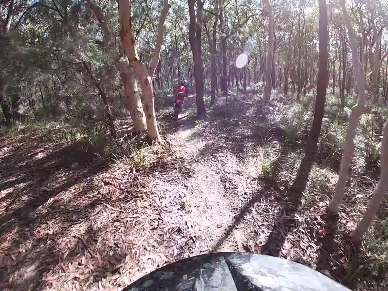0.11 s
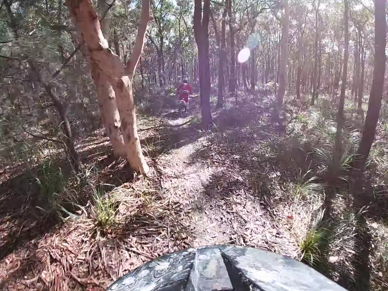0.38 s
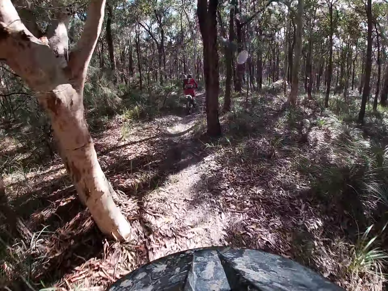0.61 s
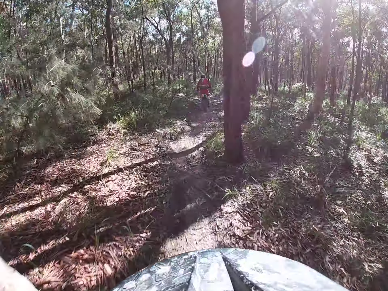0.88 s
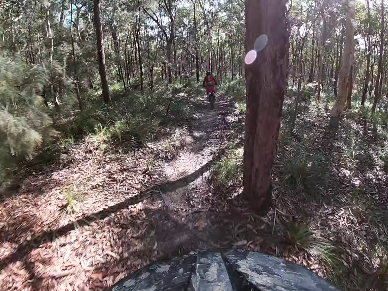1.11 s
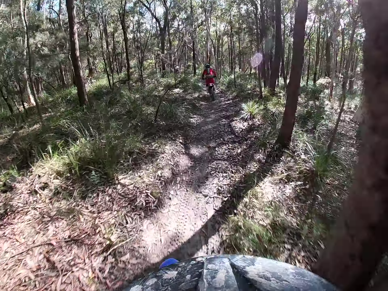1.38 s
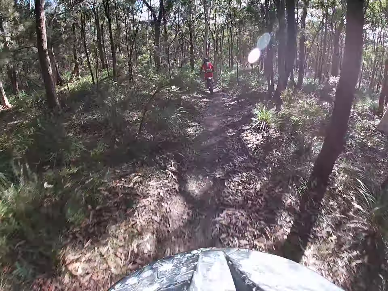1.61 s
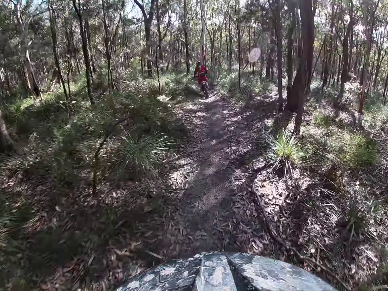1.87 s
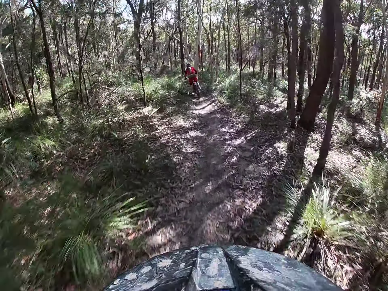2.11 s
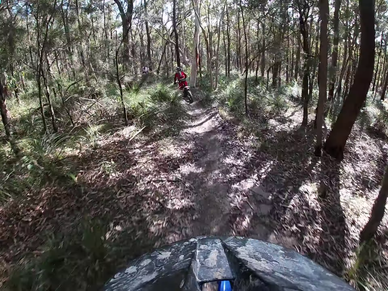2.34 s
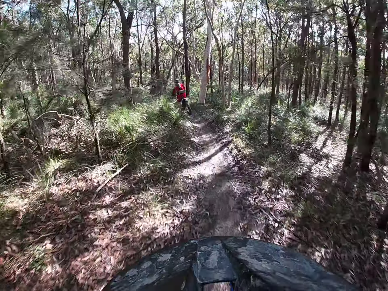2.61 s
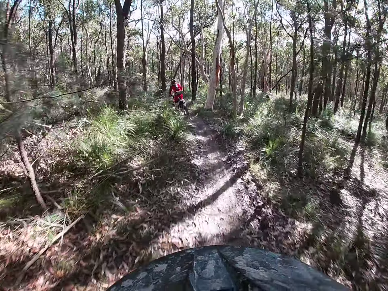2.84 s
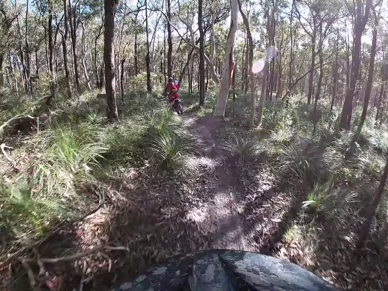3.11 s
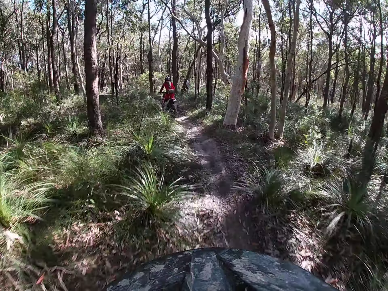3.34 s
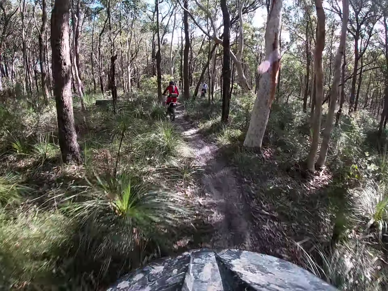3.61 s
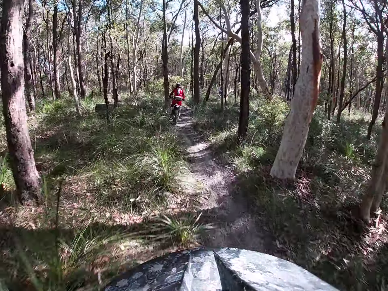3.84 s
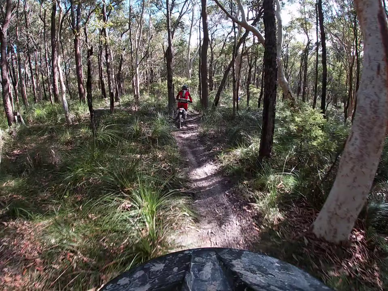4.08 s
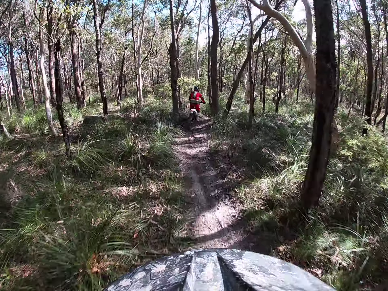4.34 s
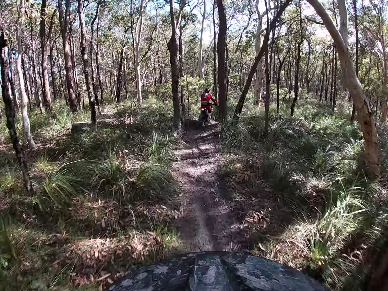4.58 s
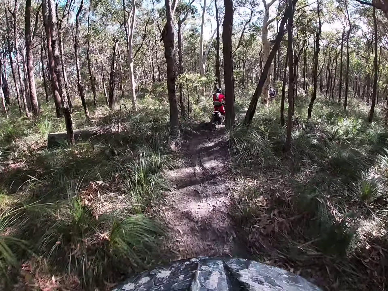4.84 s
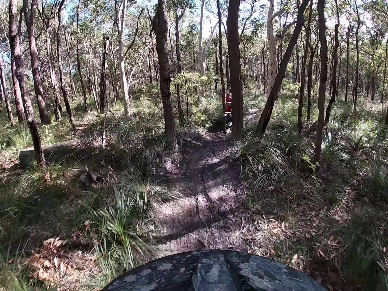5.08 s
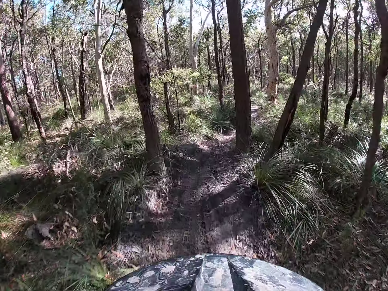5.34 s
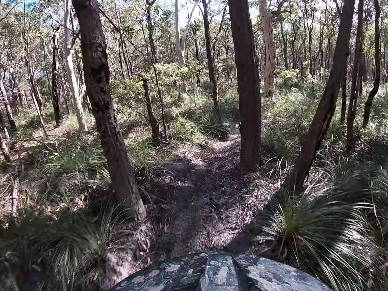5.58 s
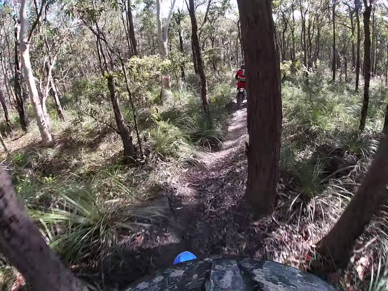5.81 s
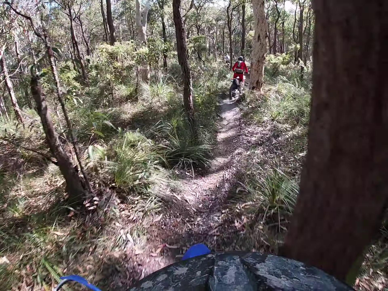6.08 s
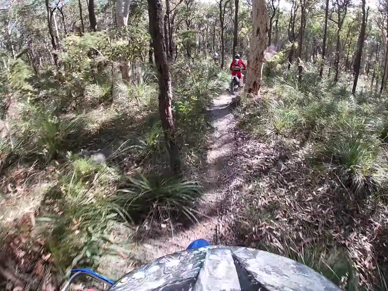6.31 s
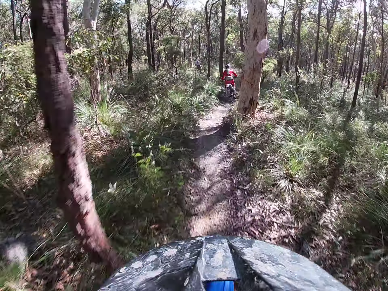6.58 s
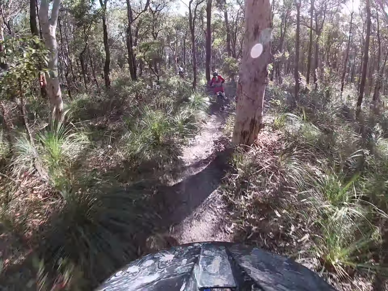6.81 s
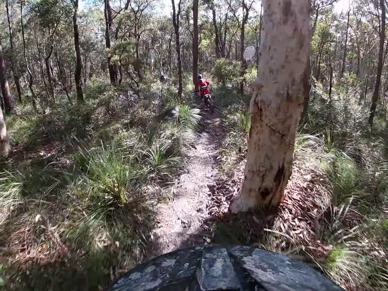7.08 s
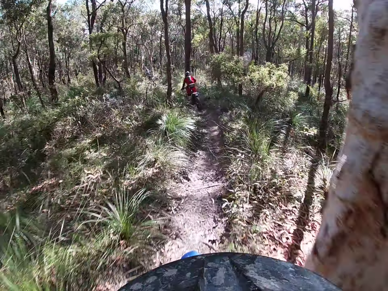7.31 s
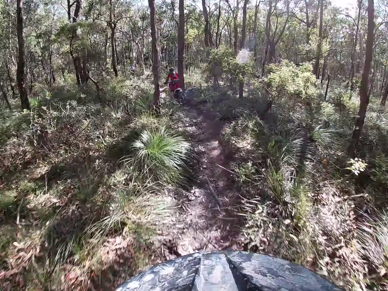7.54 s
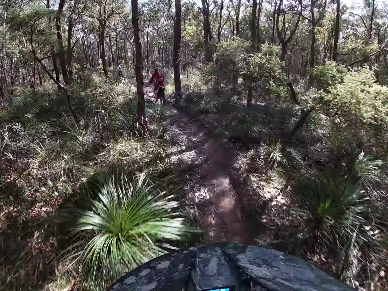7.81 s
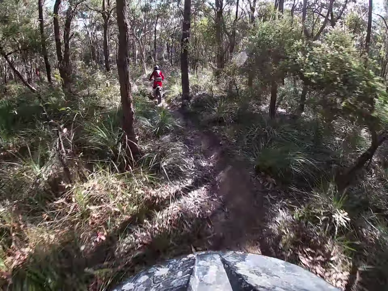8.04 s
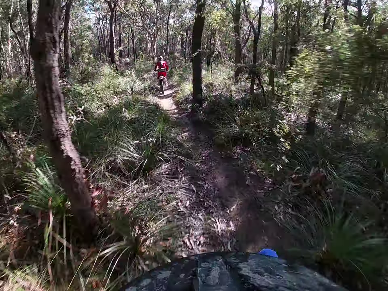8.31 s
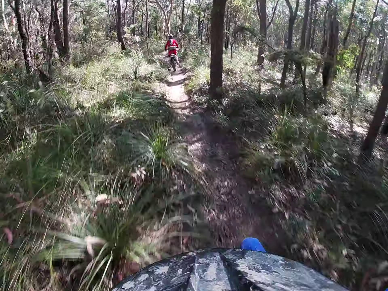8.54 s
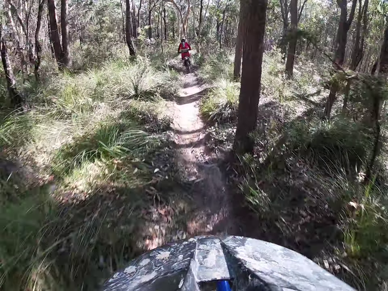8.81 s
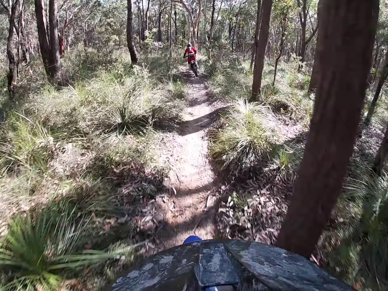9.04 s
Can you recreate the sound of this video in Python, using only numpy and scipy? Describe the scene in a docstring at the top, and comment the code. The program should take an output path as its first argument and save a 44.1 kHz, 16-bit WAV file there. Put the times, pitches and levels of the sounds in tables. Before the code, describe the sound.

Muffled onboard dirt bike engine, low throaty popping that rises and sags with quick throttle changes, over buzzing parts, chain clatter and soft wind buffeting.

```python
"""Forest trail, riding a single-cylinder dirt bike, the microphone muffled in a sealed case on the rider's helmet.
Each exhaust pulse rings the pipe modes; cycles burn fully or weakly as the throttle works, and some miss.
Rough gas rushes out with each pulse, and the frame hums at the firing rate and its double.
A loose panel and a bracket ring at their resonances; tyres, chain and valve gear make broad noise.
Low noise is wind on the case, clusters of tiny snaps are brush, short noise bursts are ticks and jolts."""
import sys
import numpy as np
from scipy import signal
from scipy.fft import rfft, irfft, next_fast_len
from scipy.io import wavfile
from scipy.ndimage import map_coordinates

SR = 44100
rng = np.random.default_rng(int(sys.argv[2]) if len(sys.argv) > 2 else 0)


def generate_wav(signal):
    """Clip the signal to [-1, 1] and save it as 16-bit WAV at the path in sys.argv[1]."""
    frames = np.transpose(np.atleast_2d(signal))
    scaled = np.clip(frames, -1, 1) * 32767
    pcm = np.round(scaled).astype(np.int16)
    wavfile.write(sys.argv[1], SR, pcm)


def linear_from_db(decibels):
    """Turn decibels (scalar or array-like) into linear amplitude factors; 0 gives 1."""
    return 10 ** (np.asarray(decibels, float) / 20)


N = 404397   # samples


def rms_one(x):
    """Scale to rms 1."""
    return x / np.sqrt(np.mean(x ** 2) + 1e-20)


def in_time(rows, s):
    """Columns of a curve table, interpolated at times s."""
    at, *columns = np.transpose(rows)
    return [np.interp(s, at, column) for column in columns]


def coloured(spectrum):
    """Noise shaped to a (hz, density_db) spectrum, then scaled to rms 1."""
    hz, db = np.transpose(spectrum)
    size = next_fast_len(N)
    grid_hz = np.maximum(np.arange(size // 2 + 1) * SR / size, 1)
    shape = linear_from_db(np.interp(np.log(grid_hz), np.log(hz), db, left=-90, right=-120))
    white = rng.standard_normal(size)
    return rms_one(irfft(rfft(white) * shape, size)[:N])


def drift(rate):
    """Smooth chance curve through unit-spread random knots, rate knots per second."""
    knots = rng.standard_normal(2000)
    return map_coordinates(knots, [np.arange(N) * rate / SR], order=3)


def add(out, s, sound):
    """Mix a short sound in at time s."""
    i = int(round(s * SR))
    out[i:i + len(sound)] += sound[:max(len(out) - i, 0)]


# Engine speed: start_s [s], pulse_rate_hz [exhaust pulses per s]
ENGINE_SPEED = [(0.0, 37.43), (0.23, 34.92), (0.38, 39.77), (0.98, 39.84), (1.04, 38.07), (1.36, 41.14),
                (1.6, 34.06), (1.77, 47.97), (1.92, 41.18), (2.15, 47.68), (2.23, 44.05), (2.67, 45.81),
                (2.83, 37.43), (3.0, 42.37), (3.19, 39.46), (3.6, 44.09), (3.84, 34.63), (4.34, 32.91),
                (4.57, 35.72), (4.94, 32.78), (5.09, 34.04), (5.9, 32.83), (6.02, 36.69), (6.25, 29.42),
                (6.57, 42.92), (7.04, 43.39), (7.17, 35.18), (7.67, 43.08), (7.78, 36.16), (8.19, 36.34),
                (8.4, 45.38), (8.54, 39.67), (8.77, 44.85), (9.17, 48.16)]


def engine_turns():
    """Running count of engine cycles, one exhaust pulse each: the integral of the pulse rate."""
    pulse_rate_hz, = in_time(ENGINE_SPEED, np.arange(N) / SR)
    return 0.02 + np.cumsum(pulse_rate_hz) / SR   # 0.02 of a cycle is gone at time zero


# Throttle, held until the next row: start_s [s], full_burns [share of cycles, 0 shut to 1 open]
THROTTLE_HELD = [(0, 0), (.32, .5), (.475, .5), (.55, 1), (.6, .5), (.75, 1), (.9, .5), (1.05, .9),
                 (1.235, .5), (1.41, 1), (1.435, .5), (1.485, .34), (1.62, 1), (1.75, .95), (2.19, .5),
                 (2.35, 1), (2.51, .9), (2.68, 0), (2.73, .125), (2.93, .34), (3.1, .17), (3.3, .34),
                 (3.67, 0), (4.27, .4), (4.77, 1), (4.98, .96), (5.6, .5), (5.75, .75), (6.05, 0),
                 (6.08, 1), (7.03, 0), (7.15, .36), (7.26, .5), (7.34, .5), (7.64, .34), (7.93, .17),
                 (8.18, 1), (8.34, .5), (8.54, 1)]
# Cycles with no burn: a faint weak pulse, 13.5 dB down, with a dull puff: start_s [s], puff_db [dB]
MISFIRES = [(.94, -26), (2.67, -22), (2.99, -36.5), (3.55, -32), (3.74, -21), (5.23, -13), (5.41, -26),
            (5.53, -24), (5.71, -8), (6.15, -8), (6.28, -10), (7.73, -11.5), (8.11, -13)]


def full_burns(starts):
    """At part throttle fresh charge gathers over some weak cycles before each full burn; misfires do not burn."""
    since, opening = np.transpose(THROTTLE_HELD)
    row = np.searchsorted(since, starts + .004) - 1
    cycles = np.arange(len(row)) - np.searchsorted(row, row)   # since the throttle moved
    charge = opening[row] * cycles + 1e-6
    burns = np.floor(charge) > np.floor(charge - opening[row])
    missed = {np.argmin(abs(starts + .004 - s)): puff_db for s, puff_db in MISFIRES}
    burns[list(missed)] = False
    return burns, missed


def swell(hz, decay_ms):
    """A pipe mode fed through a chamber: its envelope peaks at 1 after one decay time, then dies."""
    u = np.arange(2600) / SR
    k = u * 1000 / decay_ms
    return k * np.exp(1 - k) * np.sin(2 * np.pi * hz * u)


# Seven pipe modes, lowest first, before the trims, wander and stretch below:
# pitch_hz [Hz], level_db [dB], decay_ms [ms], polarity [signed gain]
COOL_GAS_MODES = [(87.5, -14.5, 2.9, 0.9), (181.7, -7.5, 2.95, 0.97), (252.5, -23, 4.3, -1.1),
                  (320, -6, 3.6, -0.36), (501.5, -9, 2.97, -0.43), (680, -22.5, 3.8, -0.3),
                  (871, -38.5, 4, 0.77)]   # full burn, cool gas
HOT_GAS_MODES = [(97, -18, 4.1, 1), (214, -7, 3.3, 0.95), (300, -12, 3.2, -0.57), (340.5, -6.5, 1.2, -0.41),
                 (565, -6.5, 2.1, -0.34), (755, -30.5, 3.6, -0.31), (940, -37, 2.5, 0.53)]   # full burn, hot gas
WEAK_BURN_MODES = [(76, -28.5, 4, 0.92), (152.2, -12.5, 5.6, -0.96), (215.8, -16.5, 3.6, 0.66),
                   (280, -9, 4.48, -0.64), (470, -2, 2.34, -0.15), (695, -26.5, 8.6, -0.084),
                   (872, -50.5, 6.7, 0.81)]   # weak burn or miss
# Engine load: start_s [s], bark_db [dB], sharpness_db [dB], heat [0 cool to 1 hot gas]
ENGINE_LOAD = [(0, -16, 11.5, 0.15), (.3, -19.5, 9, 0.066), (.56, -12.5, 2, 0.35), (1, -16, 9, 0.51),
               (1.4, -13.5, 3.5, 0.41), (1.52, -20, 1, 0.31), (1.7, -10.5, 3, 0.26), (1.82, -24, 7.5, 1.18),
               (2.1, -13, 3.5, 0.47), (2.25, -13, 3, 0.37), (2.4, -12, 0.5, 0.25), (2.58, -12.5, 1, 0.13),
               (2.7, -11, -1.5, 0.42), (2.9, -14, 0.5, 0.2), (3.19, -13.5, 0, 0.23), (3.5, -14.5, 1, 0.3),
               (3.72, -16.5, 12, 0.4), (4.03, -20.5, 20, .1), (4.35, -20.5, 8.5, 0.044),
               (4.8, -17.5, 9.5, 0.049), (5.3, -14, 10, 0.053), (5.6, -15, 6, 0.094), (5.8, -20.5, 1, .1),
               (6.18, -24.5, 8, 0.45), (6.4, -14, 1.5, 0.36), (6.7, -16.5, 6, 0.65), (7.02, -13, 2, 0.54),
               (7.1, -18.5, 6, 0.44), (7.6, -17, 1, 0.57), (7.78, -19, 11, 0.59), (8.12, -20, 10.5, 0.3),
               (8.28, -10, 1, 0.72), (8.45, -21, 9, 1.18), (8.65, -19, 2.5, 0.99), (9, -15, -1.5, 0.94),
               (9.17, -15, 3, 1)]
# Back pressure makes the middle modes ring on: start_s [s], pressure_db [dB], sixth_mode_db [dB]
PIPE_PRESSURE = [(0, 2, -1.5), (.18, 2, 15), (.3, 3, 4), (.45, 1.7, 6), (1, 1.4, -1.5), (1.5, 1.8, -0.5),
                 (1.9, 3, 6), (2.2, 1, 10.5), (2.6, 2.5, 9.5), (3, 1.4, 10.5), (3.5, 1.9, 1.5),
                 (4, 1.5, -6.5), (4.5, 1, -6.5), (5, 2.5, 4.5), (5.5, 3, 1), (6, 1.8, -1), (6.4, 3, 0),
                 (6.9, 1.8, 5.5), (7.3, 2.2, -5), (7.8, 1.9, -7), (8.2, 2, 6.5), (8.6, 1.3, 12.5),
                 (9.17, 2.5, -7)]
# Gain of each pipe mode: share [dB per dB]; with bark, the lowest booms on the overrun
FULL_BARK_SHARES = [-0.39, 0.58, 1, -0.65, -0.012, 0.7, 0.92]
WEAK_BARK_SHARES = [-3.5, 1, 0, -0.13, 0.96, 0.91, 0.4]
SHARPNESS_SHARES = [0.29, 0.16, 0, 0.014, 0.38, 1, 0.75]
PIPE_PRESSURE_SHARES = [-1.3, -0.14, 1, 0.94, -0.45, -1.1, -1.1]


def exhaust(turns):
    """Each cycle's pulse sets seven pipe modes swelling and dying; a short snap opens each full burn."""
    starts = np.searchsorted(turns, np.arange(int(turns[-1]) + 1)) / SR
    bark_db, sharp_db, heat = in_time(ENGINE_LOAD, starts)
    heat = np.clip(heat, 0, 1.3)
    pressure_db, sixth_db = in_time(PIPE_PRESSURE, starts)
    burns, missed = full_burns(starts)

    bark_shares = np.where(burns[:, None], FULL_BARK_SHARES, WEAK_BARK_SHARES)
    trims_db = (bark_db + 16)[:, None] * bark_shares   # bark counts from -16 dB
    trims_db += np.outer(sharp_db, SHARPNESS_SHARES)
    trims_db += np.outer(pressure_db, PIPE_PRESSURE_SHARES)
    trims_db += np.outer(sixth_db, np.arange(7) == 5)
    # a full burn after a weak or missed cycle is slightly quieter
    trims_db += -0.5 * (burns & ~np.roll(burns, 1))[:, None]

    cool, hot, weak = np.array(COOL_GAS_MODES), np.array(HOT_GAS_MODES), np.array(WEAK_BURN_MODES)
    stretch = 1 + 0.25 * pressure_db   # back pressure lengthens the ringing
    chance = rng.standard_normal((len(starts), 16))
    out = np.zeros(N)
    for k, s in enumerate(starts):
        # sound is faster in hot gas, so the modes rise
        if burns[k]:
            modes = cool + heat[k] * (hot - cool)
        else:
            modes = weak * [1 + 0.2 * heat[k], 1, 1, 1]
        # each mode wanders alone, and all wander together
        wander_db = [.6, .5, .6, .7, .8, 1.2, 1.5] * chance[k, :7]
        wander_db = wander_db + [0, .3, .6, .6, .7, .9, .9] * chance[k, 15:]
        detune = [.008, .005, .008, .009, .013, .013, .016] * chance[k, 7:14] + .006 * chance[k, 14]
        pulse = 0
        for m, (hz, db, decay_ms, polarity) in enumerate(modes):
            gain = linear_from_db(db + trims_db[k, m] + wander_db[m])
            ring = swell(hz * (1 + detune[m]), max(decay_ms * stretch[k], 1.5))
            pulse = pulse + polarity * gain * ring
        if k in missed:   # the unburnt charge leaves as a low puff
            pulse = linear_from_db(-13.5) * pulse + linear_from_db(missed[k]) * swell(74, 5.9)
        leaves = s - .0013 * heat[k] * burns[k]   # a full burn in hot gas leaves sooner
        add(out, max(leaves, 0), pulse)
        if burns[k]:   # the snap runs 1.5 ms ahead
            snap_db = -25 + 0.094 * sharp_db[k] + 1.5 * chance[k, 6]
            add(out, leaves - .0015, linear_from_db(snap_db) * swell(656, 1.3))
    return out


def silencer(pulses):
    """A low-pass at 1500 Hz takes the edge off each pulse."""
    return signal.sosfilt(signal.butter(4, 1500, fs=SR, output="sos"), pulses)


# Turbulent gas at the outlet: start_s [s], level_db [dB]
OUTLET_RUSH = [(0, -35.5), (.6, -38), (1.5, -37), (1.9, -43.5), (2.2, -30), (2.6, -32), (2.9, -32),
               (3.4, -34), (4, -43.5), (4.8, -41), (5.5, -40), (6.2, -40.5), (6.7, -31.5), (7.2, -33),
               (7.6, -29.5), (8.1, -42.5), (8.45, -27.5), (9.17, -26.5)]
# Its relative spectrum: pitch_hz [Hz], density_db [dB per Hz]
OUTLET_SPECTRUM = [(300, -18), (450, 2.5), (700, 0.5), (900, -5.5), (1200, -15), (2000, -18.5), (3500, -35),
                   (5000, -46)]


def rush(turns):
    """Each pulse drags a puff of rough noise out of the pipe, no two alike."""
    k = (turns % 1) / 0.17   # the puff peaks 0.17 of a cycle in
    strength_db = 2.5 * rng.standard_normal(2000)[turns.astype(int)]
    level_db, = in_time(OUTLET_RUSH, np.arange(N) / SR)
    return linear_from_db(level_db + strength_db) * k * np.exp(1 - k) * coloured(OUTLET_SPECTRUM)


# Frame hum: start_s [s], first_order_db [peak dB], second_order_db [peak dB]
FRAME_HUM = [(0, -34.5, -40), (.8, -31, -32.5), (1.9, -34.5, -32.5), (3, -36, -36), (3.7, -33.5, -31),
             (4.4, -31.5, -32), (5.1, -32.5, -25), (5.8, -31.5, -21.5), (6.3, -29.5, -31.5),
             (6.9, -32, -38), (7.8, -32, -27), (8.4, -25.5, -32.5), (9.17, -31, -34)]


def thrum(turns):
    """The frame hums as two sines on the first two orders of the firing rate."""
    first_db, second_db = in_time(FRAME_HUM, np.arange(N) / SR)
    first = linear_from_db(first_db) * np.sin(2 * np.pi * (turns - .3))
    second = linear_from_db(second_db) * np.sin(4 * np.pi * (turns - .1))
    return first + second


# Resonances of each loose part: pitch_hz [Hz], width_hz [Hz], level_db [relative dB]
PANEL_MODES = [(1275, 58, 0), (1215, 70, -7), (1155, 30, -14), (1400, 20, -19)]
BRACKET_MODES = [(2150, 230, 0), (2600, 500, -5), (1680, 130, -7), (3720, 200, -19)]


def buzz(turns, modes, level_db, throb_db, lag, knock_db, patchy_db):
    """A loose part rings at its resonances: knocked about once a cycle and shaken by the frame."""
    fade_db = -2 * throb_db * ((turns - lag) % 1)   # across each cycle
    shake = rng.standard_normal(N) * linear_from_db(fade_db + 1.0 * drift(25))
    knocked = np.diff(np.floor(turns - lag + .03 * drift(40)), prepend=0) > 0
    knocks = knocked * linear_from_db(1.8 * drift(30))
    drive = rms_one(shake) + linear_from_db(knock_db) * rms_one(knocks)
    out = 0
    for m, (hz, width_hz, db) in enumerate(modes):
        r = np.exp(-np.pi * width_hz / SR)   # pole radius
        section = [1, 0, -1, 1, -2 * r * np.cos(2 * np.pi * hz / SR), r * r]
        ring = rms_one(signal.sosfilt([section, section], drive))
        out = out + (-1) ** m * linear_from_db(db) * ring
    return linear_from_db(level_db + patchy_db * drift(4.8)) * out


# Relative noise spectra: pitch_hz [Hz], density_db [dB per Hz]
ROAR_SPECTRUM = [(400, 10.5), (650, 2.5), (800, -9), (1100, -8), (1400, -10.5), (1650, -11.5),
                 (2000, -15.5), (2600, -29), (4000, -40.5)]
CLATTER_SPECTRUM = [(1500, -8), (2500, -4.5), (3100, -5), (3600, -7), (4200, -11.5), (5500, -11),
                    (7200, -25), (9000, -28), (10300, -34), (10700, -45), (12000, -35), (13000, -38.5),
                    (14500, -50)]


def clatter(turns, roar_db, clatter_db):
    """Tyres, chain and valve gear: two broad noises that throb faintly with the cycle and flicker."""
    throb_db = 1.0 * np.cos(4 * np.pi * (turns - .2)) + 1.0 * np.cos(2 * np.pi * (turns - .3))
    flicker_db = 1.0 * drift(30)
    roar_level_db = roar_db + 0.35 * throb_db + flicker_db + 0.82 * drift(26)
    roar = linear_from_db(roar_level_db) * coloured(ROAR_SPECTRUM)
    return roar + linear_from_db(clatter_db + throb_db + flicker_db) * coloured(CLATTER_SPECTRUM)


# Wind on the case: start_s [s], level_db [relative dB]
WIND_GUSTS = [(0, -29.5), (.15, -51.5), (.43, -32.5), (1.1, -31.5), (1.9, -30.5), (2.3, -36), (3.7, -28.5),
              (3.9, -36.5), (4.3, -27.5), (4.65, -38.5), (5.03, -28), (5.4, -30), (5.72, -27), (6.1, -28.5),
              (6.9, -31.5), (7.76, -27.5), (8.2, -28.5), (8.9, -24.5), (9.17, -29)]
# Its relative spectrum: pitch_hz [Hz], density_db [dB per Hz]
WIND_SPECTRUM = [(15, -24), (30, -11.5), (45, -9.5), (70, -13), (110, -15), (200, -17), (400, -26),
                 (900, -59)]


def wind():
    """Lumpy low buffeting on the case: bass noise whose level follows the gusts and drifts."""
    gust_db, = in_time(WIND_GUSTS, np.arange(N) / SR)
    lumps_db = 1.0 * drift(10)
    return linear_from_db(gust_db + 7.0 + lumps_db) * coloured(WIND_SPECTRUM)


# Leaves and brush sweep past: middle_s [s], length_s [s, between the 1/e points], level_db [dB]
BRUSH_SWEEPS = [(0.496, .08, -63.5), (1.012, 0.16, -65.5), (1.75, 0.13, -73), (6.05, 0.13, -77),
                (6.5, 0.37, -70.5), (7.445, 0.57, -73), (7.846, .15, -67), (8.595, 0.36, -71.5)]


def rustle():
    """Leaves and brush: dense tiny snaps, about 1500 a second, that swell and fade."""
    now = np.arange(N) / SR
    swells = sum(linear_from_db(db) * np.exp(-((now - s) * 2 / length) ** 2) for s, length, db in BRUSH_SWEEPS)
    snap_db = 4.0 * np.minimum(rng.exponential(1, N), 5)
    snaps = (rng.random(N) < 1500 / SR) * linear_from_db(snap_db) * rng.choice([-1, 1], N)
    band = signal.butter(1, [4500, 9500], "band", fs=SR, output="sos")
    bright = signal.sosfilt(band, snaps + 1e-18)
    softened = signal.sosfilt(signal.butter(4, 11000, fs=SR, output="sos"), bright)
    return swells * rms_one(softened)


# Twigs and grit on the helmet: start_s [s], level_db [relative dB]
HELMET_TICKS = [(0.4888, -55.5), (1.0294, -61), (6.4194, -57), (6.6119, -63), (7.862, -58), (8.098, -50.5)]


def ticks():
    """Twigs and grit tap the helmet: bright noise bursts that die in a few milliseconds."""
    out, u = np.zeros(N), np.arange(900) / SR
    bursts = rng.standard_normal((len(HELMET_TICKS), 900))
    for (s, db), burst in zip(HELMET_TICKS, bursts):
        add(out, s, linear_from_db(db + 8.0) * burst * np.exp(-u / .003))
    band = signal.butter(2, [6000, 10000], "band", fs=SR, output="sos")
    return signal.sosfilt(band, out + 1e-18)


# Chain and levers rattle over roots: start_s [s], level_db [relative dB]
ROOT_JOLTS = [(0.5512, -38), (0.7552, -55), (1.9989, -40), (2.9946, -49), (5.8207, -39.5), (5.9389, -33),
              (6.3296, -31), (6.4717, -31), (6.5526, -40.5), (7.4261, -33), (7.5024, -38), (8.0985, -33.5),
              (8.571, -32), (8.7416, -58)]


def jolts(count=16):
    """Chain and levers rattle over roots: dull noise bursts, with lesser ones at random times."""
    out, u = np.zeros(N), np.arange(2200) / SR
    small_s = rng.random(count) * N / SR
    small_db = -47 + 2 * rng.standard_normal(count)   # same scale as the table
    for s, db in [*zip(small_s, small_db), *ROOT_JOLTS]:
        add(out, s, linear_from_db(db - 4.0) * rng.standard_normal(2200) * np.exp(-u / 0.02))
    band = signal.butter(3, [1500, 4500], "band", fs=SR, output="sos")
    return signal.sosfilt(band, out + 1e-18)


# How hard the trail shakes the bike, and how loose the panel and bracket sit:
# start_s [s], shake_db [relative dB], panel_db [relative dB], bracket_db [relative dB]
TRAIL_SHAKE = [(0.03, -53.5, -42, -57), (0.05, -53.5, -44.5, -54), (0.26, -52.5, -35, -50.5),
               (0.48, -51, -36.5, -42.5), (0.59, -52, -38, -43), (0.61, -52, -42, -42.5),
               (0.69, -52, -41.5, -45), (0.76, -52, -36, -41), (0.79, -52, -53, -51), (0.84, -53, -38, -39),
               (0.86, -49.5, -54.5, -54), (0.91, -51, -37.5, -46.5), (1.04, -53, -51, -45.5),
               (1.17, -53, -45, -54), (1.37, -49.5, -32, -46.5), (1.42, -52.5, -44, -45.5),
               (1.7, -51.5, -47, -50), (1.75, -51, -35.5, -42.5), (1.93, -54.5, -58, -55),
               (2.05, -52.5, -45, -51), (2.63, -52.5, -38, -47.5), (2.83, -52.5, -42.5, -51),
               (3.1, -53, -40, -50), (3.37, -50.5, -38, -48), (3.82, -53, -48.5, -51.5),
               (4.25, -52.5, -49, -49), (4.35, -53.5, -51, -47.5), (4.73, -54, -55, -51.5),
               (4.9, -55, -49, -53.5), (5.06, -55.5, -44, -49), (5.4, -53, -44, -53),
               (5.87, -53.5, -49.5, -50), (5.92, -54, -54, -46), (6.02, -52, -38.5, -57),
               (6.07, -48, -46, -50), (6.18, -53.5, -50.5, -47.5), (6.53, -51.5, -42, -46.5),
               (6.6, -48.5, -39.5, -40.5), (6.96, -54.5, -46, -50), (7.06, -50, -37.5, -42),
               (7.13, -52.5, -41, -50.5), (7.46, -49.5, -42, -45.5), (7.54, -49, -35, -45),
               (7.97, -51.5, -44.5, -54), (8.33, -53, -48.5, -47), (8.42, -48, -42, -42.5),
               (8.55, -52.5, -53, -42), (8.68, -50, -34.5, -44), (9.11, -52, -55.5, -43.5)]


def scene():
    """Every sound of the bike and the trail adds up at one microphone."""
    turns = engine_turns()
    shake_db, panel_db, bracket_db = in_time(TRAIL_SHAKE, np.arange(N) / SR)
    roar_db = -35 + 1.7 * (shake_db + 53)   # rises faster than the shake

    engine = silencer(exhaust(turns)) + rush(turns) + thrum(turns)
    panel = buzz(turns, PANEL_MODES, panel_db - 0.4, throb_db=6.0, lag=.63, knock_db=0.0, patchy_db=-0.66)
    bracket = buzz(turns, BRACKET_MODES, bracket_db - 4.0, throb_db=5.0, lag=.6, knock_db=-8.0, patchy_db=1.6)
    noise = clatter(turns, roar_db, shake_db - 1.0) + wind()
    trail = rustle() + ticks() + jolts()
    return (engine + panel + bracket + noise + trail)[None]


def low_pass(x):
    """Removes everything above the highest recorded frequency."""
    return signal.sosfilt(signal.butter(12, 14900, fs=SR, output="sos"), x)


def record(dry):
    """The microphone loses the deepest bass, and the loudest peaks are rounded."""
    bass_cut = signal.butter(1, 18, "high", fs=SR, output="sos")
    heard = signal.sosfilt(bass_cut, dry)
    top = .88   # peaks bend towards this level
    rounded = heard / (1 + (abs(heard) / top) ** 4) ** (1 / 4)
    return low_pass(rounded)


dry = scene()
out = record(dry)
generate_wav(out)
```